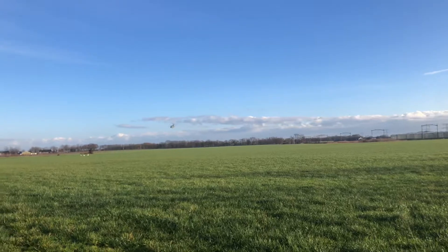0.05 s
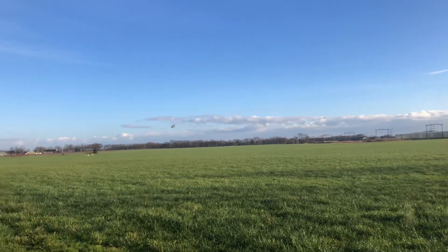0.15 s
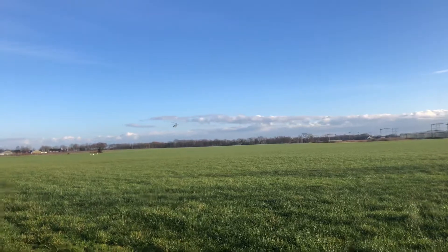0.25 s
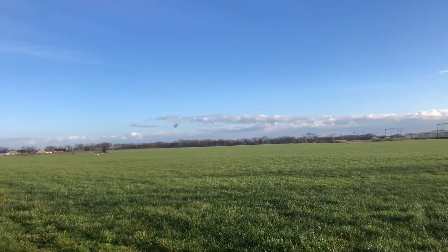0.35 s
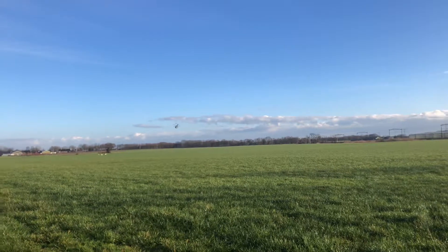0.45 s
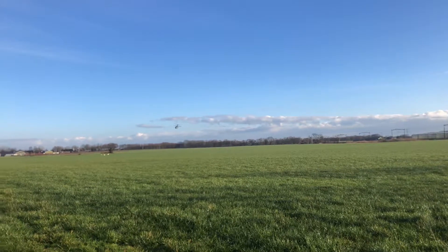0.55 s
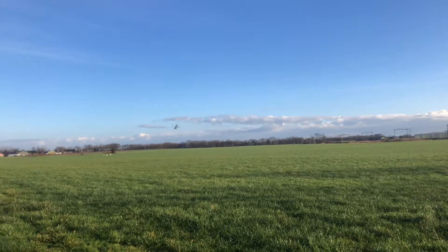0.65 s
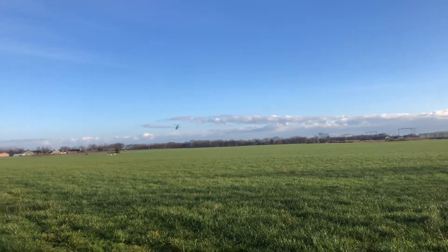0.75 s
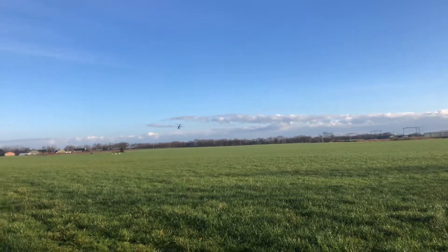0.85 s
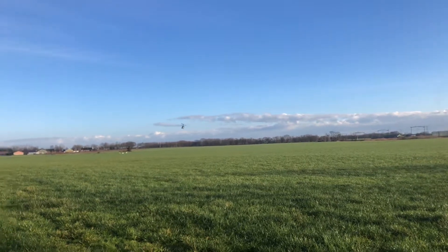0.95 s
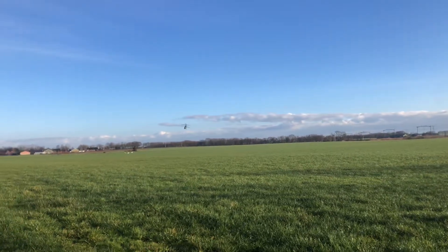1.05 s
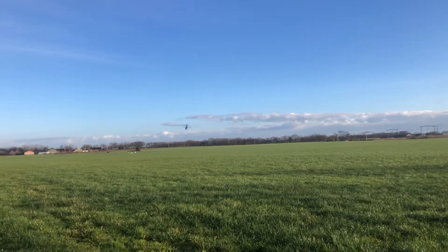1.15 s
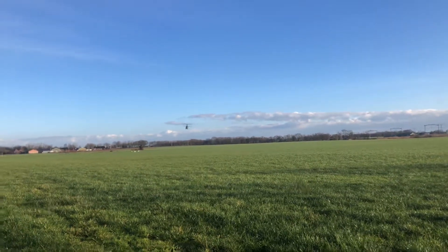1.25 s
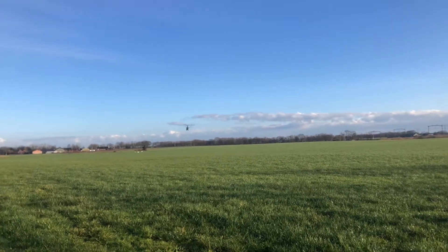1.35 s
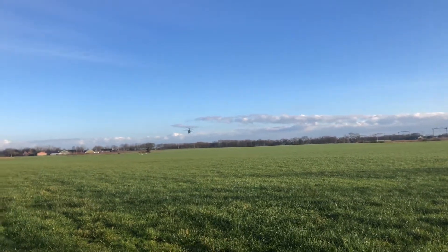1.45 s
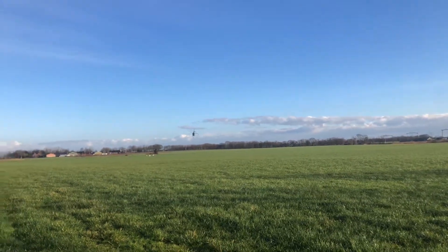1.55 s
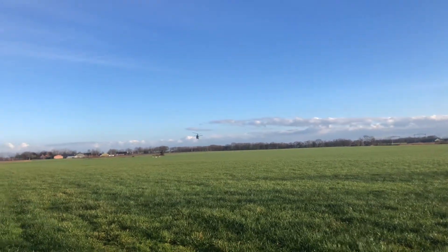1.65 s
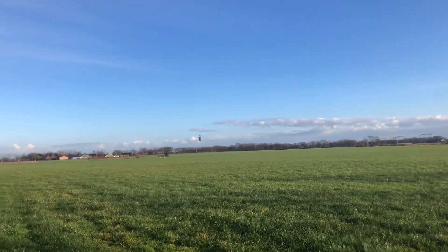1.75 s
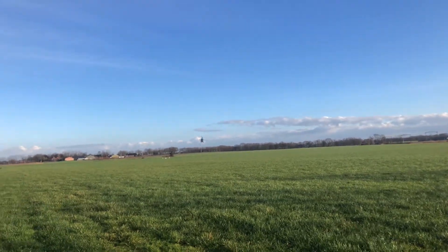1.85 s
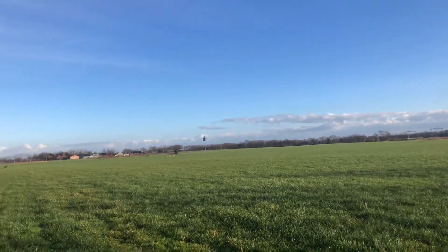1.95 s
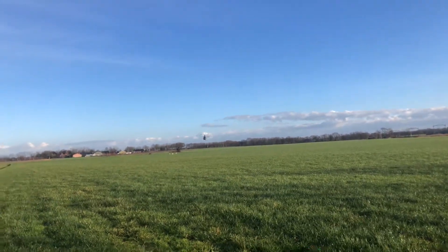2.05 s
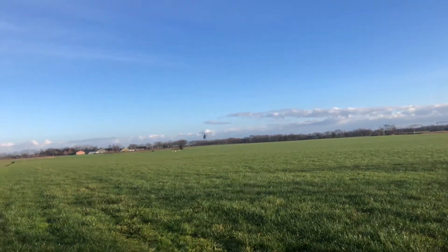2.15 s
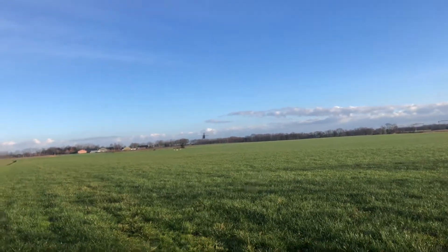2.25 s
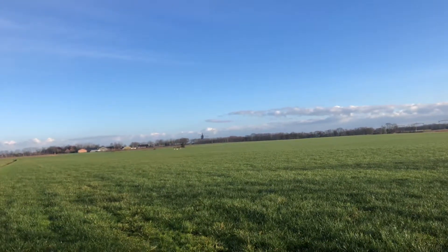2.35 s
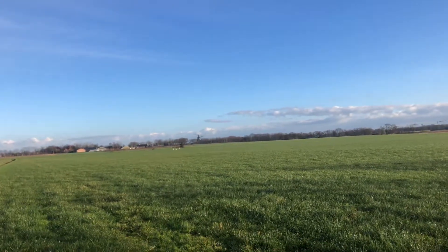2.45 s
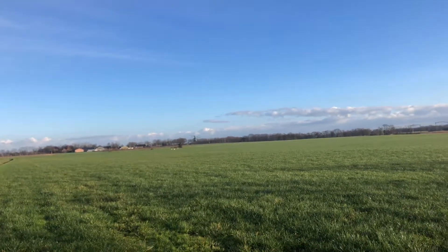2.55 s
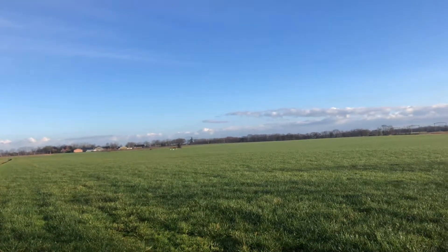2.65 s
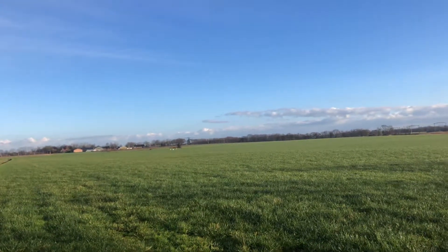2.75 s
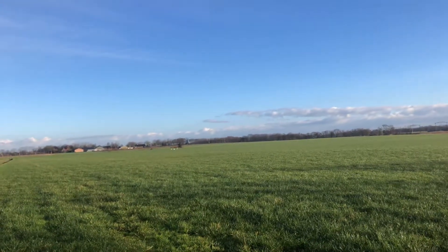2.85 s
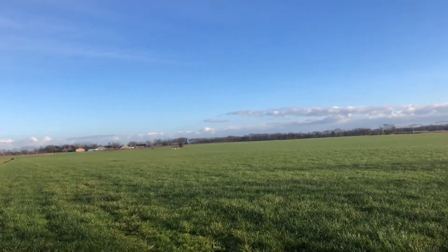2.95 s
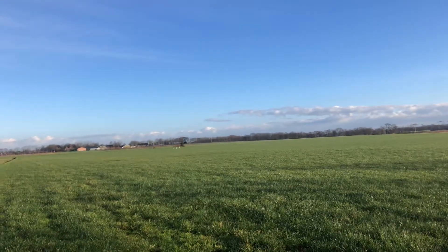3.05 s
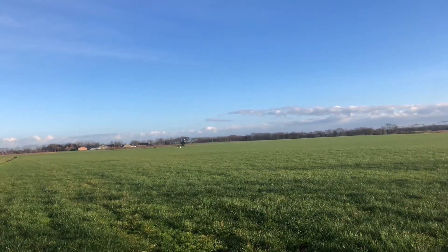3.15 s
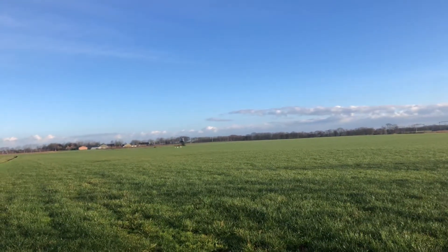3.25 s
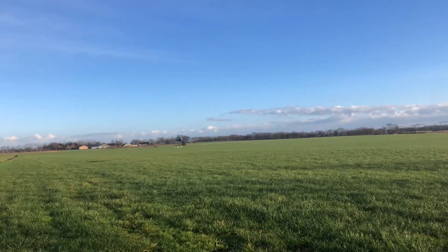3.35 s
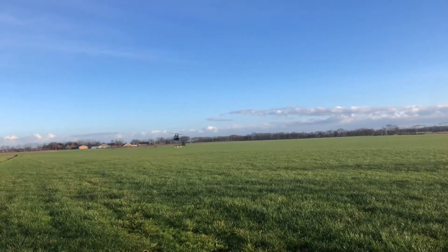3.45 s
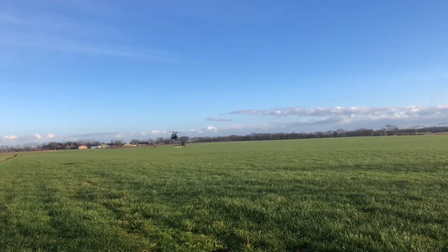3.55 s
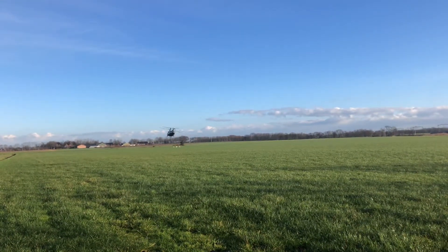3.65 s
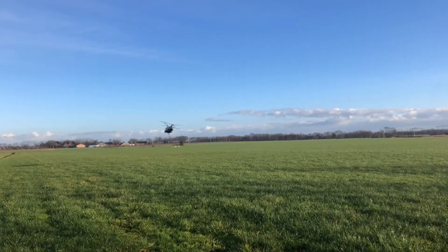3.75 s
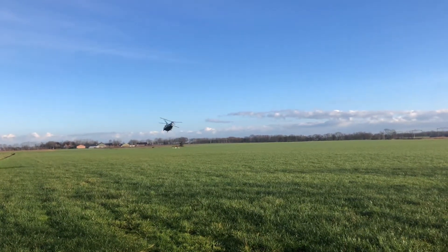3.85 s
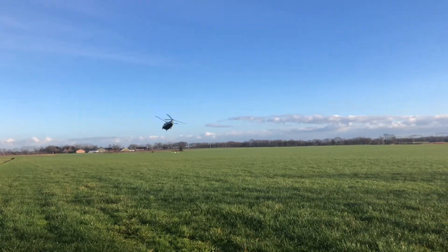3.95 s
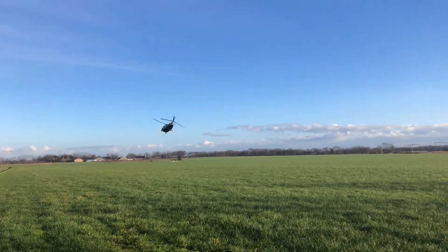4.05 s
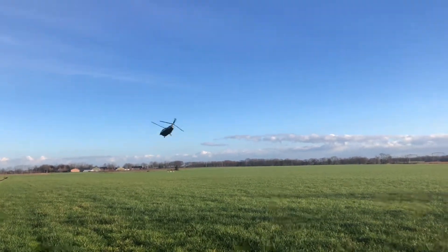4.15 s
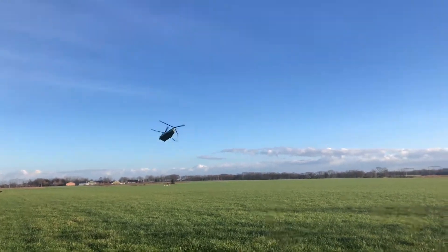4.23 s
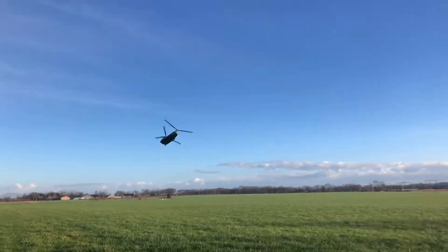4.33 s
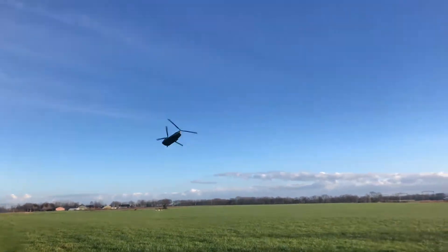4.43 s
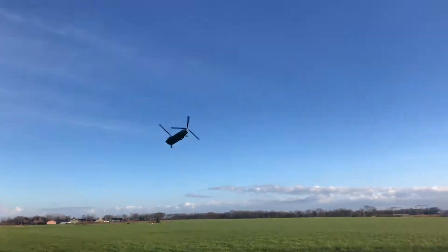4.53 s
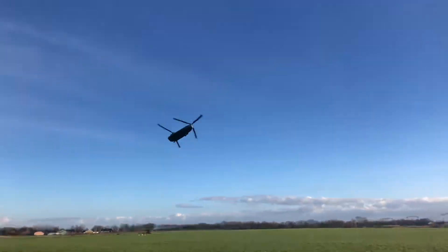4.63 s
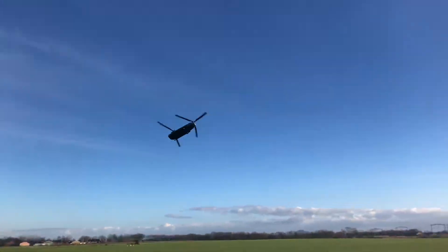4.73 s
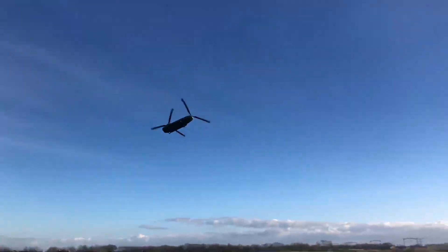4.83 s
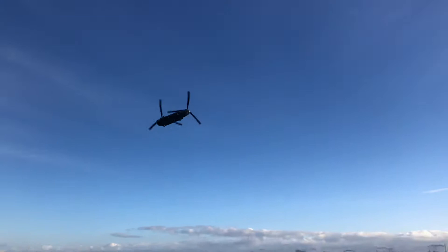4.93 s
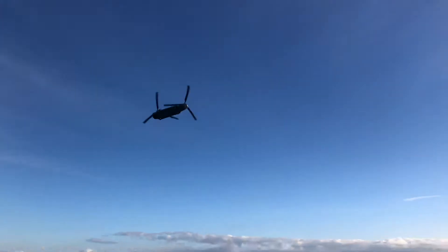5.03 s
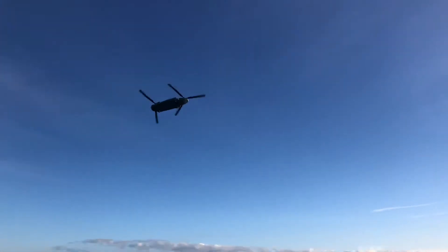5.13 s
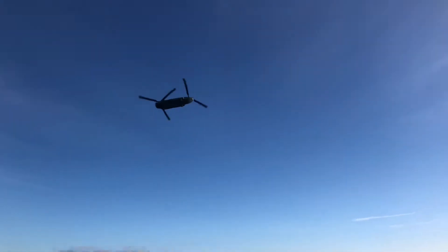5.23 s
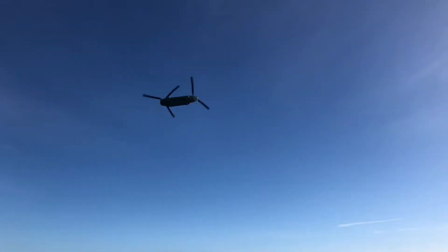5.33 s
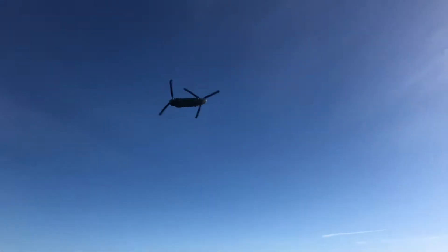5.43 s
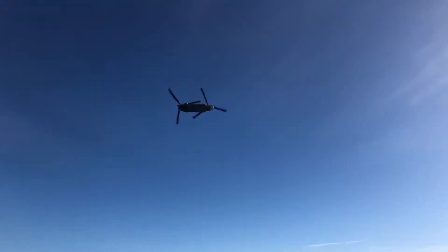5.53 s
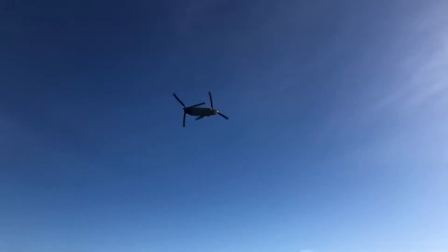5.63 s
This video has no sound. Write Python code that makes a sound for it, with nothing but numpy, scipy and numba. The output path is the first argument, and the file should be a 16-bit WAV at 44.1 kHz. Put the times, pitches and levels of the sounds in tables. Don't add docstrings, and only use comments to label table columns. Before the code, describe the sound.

A twin-rotor jet-powered model helicopter turns far away, its breathy rush and piercing whistle wavering in the air over a very faint country murmur. It then climbs close by; low rotor tones leap up, a rapid crackling chop takes over, and a hollow, downward-sweeping phasing from the ground colours the roar. It is still loud at the end, duller and lower. Handheld phone microphone, open field, no room echo..

```python
import sys
import numpy as np
from scipy import signal
from scipy.fft import rfft, irfft, next_fast_len
from scipy.io import wavfile
from scipy.ndimage import map_coordinates
from numba import njit

SR = 44100
rng = np.random.default_rng(int(sys.argv[2]) if len(sys.argv) > 2 else 0)


def undo_db(level):
    steps = np.asarray(level, float) / 20
    return 10 ** steps


def output_pcm(signal):
    pcm = np.clip(np.atleast_2d(signal).T, -1, 1) * 32767
    wavfile.write(sys.argv[1], SR, np.round(pcm).astype(np.int16))


N = 250929
FFT_SIZE = next_fast_len(N)

# t/s, f/Hz
WHINE_GLIDE = [(0, 10015), (.6, 10121), (1.2, 10180), (1.75, 10245), (2.1, 10207), (2.7, 10165), (3, 10168),
               (3.6, 10197), (3.9, 10179), (4.2, 10135), (4.5, 10056), (5.1, 9902), (5.7, 9758)]
# t/s, nearness as rotor rush level/dB, aim of the jet pipe at the listener level/dB
FLIGHT_PATH = [(0.0, -31.5, -13.5), (0.16, -30.5, -16.5), (0.4, -35.5, -10.5), (1.38, -37, -17),
               (1.95, -33, -12), (2.17, -32, -17), (3.07, -30, -16), (3.53, -28, -12.5), (3.58, -26, -13.5),
               (3.9, -26.5, -11), (4.1, -25, -9.5), (4.26, -23.5, -10.5), (4.48, -22.5, -9),
               (4.94, -20.5, -12), (4.96, -20.5, -12.5), (5.31, -21.5, -11), (5.69, -22, -12)]
# far level/dB, near level/dB, fully risen t/s, slowness of leap [0-1]
LOADING_TONES = [
    (-61, -39, 4.34, 0.2),
    (-64.5, -50.5, 4.4, 0.8),
    (-53.5, -29.5, 4.76, 0.45),
    (-52.5, -28, 4.79, 0.79),
    (-53, -34.5, 4.52, 0.8),
    (-53, -40.5, 4.2, .6),
]
# t/s, length/s, change level/dB
OVERHEAD_CHANGES = [
    (5.11, 0.18, -12),
    (4.8, .3, 8),
    (5.38, 0.13, 5.5),
    (4.74, .3, 2.0),
    (5.32, 0.26, -14),
    (5.235, 0.52, 12.5),
]
# t/s, length/s, change in slap level/dB
WAKE_BITES = [
    (4.2, 0.08, 0.5),
    (4.832, 0.052, -3.5),
    (4.973, 0.026, 3),
]
NOISE_CENTRES = [250, 1500, 6000, 13000]
# f/Hz, level/dB (per Hz)
AIR_COLOUR = [(35, -23), (100, -15.5), (400, 2), (1000, 2.5), (1400, 12.5), (1800, -2.5), (2350, 4),
              (3200, -1), (4500, -1), (5800, -3), (6100, -7.5), (6450, -2), (12000, -2), (15500, -3)]
# f/Hz while the whine is at 10170 Hz, level/dB against the rush
GEAR_TONES = [(996, -13), (1480, -30), (1992, -17), (2982, -23.5), (3978, -30), (5663, -30), (6627, -38),
              (8290, -28), (9943, -42)]
# t/s, level/dB
FLANK_FACING = [(0, -21), (1.2, -4), (1.9, -3), (3.2, -1.5), (3.7, -21), (4.4, -14), (5.7, -1.5)]
# t/s, depth level/dB, length/s
WHINE_FADES = [(.3, 11, 0.38), (1, 8, 0.11), (1.748, 18, 0.14), (2.2, 12, 0.28), (2.86, 7, 0.055),
               (3.424, 6, 0.07), (3.74, 12, 0.028), (3.98, 11, 0.035), (4.15, 2.5, 0.027),
               (4.337, 11, 0.039), (4.53, 10, 0.1), (4.756, 10, 0.058), (4.897, 16, 0.018),
               (4.997, 11, 0.029), (5.092, 16, 0.023), (5.174, 4, 0.014), (5.313, 6, 0.033),
               (5.383, 18, 0.0094), (5.44, 6, .02), (5.555, 12, 0.058), (5.67, 18, 0.023)]
# t/s, lag/ms, how cleanly the grass mirrors the highs [0-1]
GROUND_ECHO = [(0, 0.28, 0.4), (.4, 0.33, 0.7), (.8, 0.32, 1), (1.3, 0.28, 0.5), (2, .19, 0.67),
               (2.5, .16, 0.6), (3.1, 0.15, 0.5), (3.35, 0.22, 0.46), (3.5, 0.3, .45), (3.7, 0.444, 1),
               (3.9, 0.66, 1), (4.3, 1.234, 0), (4.8, 2.4, .5), (5, 3.01, 0.3), (5.2, 3.4, 0.6),
               (5.7, 3.6, 0.7)]
# t/s, f/Hz
GRASS_TURNOVER = [(0, 264), (.5, 325), (1.2, 465), (2, 313), (3.2, 292), (3.5, 584), (3.9, 1240),
                  (4.2, 1470), (5.7, 1170)]

WHINE_PER_BLADE, SLAP_AT_S = 136.43, 4.9737
PULL_S, FULL_S, PAST_S, PASSING_S = 3.44, 4.9, 5.096, 0.24
BANK_DB, BANK_S = 6, 0.71
NEAR_DB = -21.5
RUMBLE_DB, RUMBLE_FOLLOWS = -26, 0.72
HISS_GAIN_DB = 2.5
AIR_DB, AIR_FOLLOWS, AIR_AIM = -38, 1.34, 1.26
AIR_BEHIND_DB = 1.5
THROB = 0.027
CHOP, CHOP_S, CHOP_LENGTH_S = 0.6, 4.62, 0.097
CRACK_FAR_DB, CRACK_FULL_DB, CRACK_FADE_DB_PER_S = -29, -7, 22
CRACK_HZ, CRACK_SAG_HZ_PER_S = 1270, 420
THUD_HZ, TICK_HZ = 694, 2470
THUD_AHEAD_DB, THUD_BEHIND_DB, THUD_FADE_DB_PER_S = -8.5, -13.5, 8.5
TONES_RISE_S, WAVER_DB, WAVER_RAD = 3.55, 1.2, 0.05
GEAR_PATCHY_DB, GEAR_PATCHY_DB_PER_KHZ, GEAR_PATCHES_PER_S = 1.5, 0.25, 2.5
GEAR_BLUR_PER_KHZ = 0.13
GEAR_AIM_PER_KHZ = 0.13
WHINE_OVER_HISS_DB, WHINE_FOLLOWS = 1.5, 1.48
SCATTER_FAR, SCATTER_NEAR, SHIMMER_PER_S = 0.14, 0.33, 26
SLAP_ECHO_HZ, RUSH_ECHO_HZ, SCATTER_HZ = 5000, 6700, 1370
GRAZING_ECHO, STEEP_ECHO, STEEP_LAG_MS = 1, 0.74, 0.28
FIELD_DB = -51


def rms_one(x):
    return x / np.sqrt(np.mean(x ** 2) + 1e-20)


def clock():
    return np.arange(N) / SR


def in_time(rows):
    s, *columns = np.transpose(rows)
    return [np.interp(clock(), s, column) for column in columns]


def bell(at_s, width_s):
    return np.exp(-((clock() - at_s) / width_s) ** 2)


def drift(rate):
    r = np.exp(-80 * np.pi * rate / SR)
    slow = signal.lfilter([1], [1, -2 * r, r * r], rng.standard_normal(N // 40 + 2002))[2000:]
    return np.interp(np.arange(N) / 40, np.arange(len(slow)), rms_one(slow))


def bank():
    return np.exp(-clock() / BANK_S)


def load():
    return np.clip((clock() - PULL_S) / (FULL_S - PULL_S), 0, 1)


def behind():
    return np.clip((clock() - PAST_S) / PASSING_S + 1, 0, 1)


def whine_cycles():
    cycles = np.cumsum(in_time(WHINE_GLIDE)[0]) / SR
    return cycles - cycles[round(SLAP_AT_S * SR)]


def noise_levels():
    rush, aim = in_time(FLIGHT_PATH)
    far = rush - BANK_DB * bank() - NEAR_DB
    rumble = RUMBLE_DB + RUMBLE_FOLLOWS * far
    hiss = rush + aim + HISS_GAIN_DB
    air = AIR_DB + AIR_FOLLOWS * far + AIR_AIM * (aim + 12) + AIR_BEHIND_DB * behind()
    return rush, rumble, hiss, air


def slap_shape():
    past = np.maximum(clock() - PAST_S, 0)
    loaded = np.sin(np.pi / 2 * load())
    crack_db = CRACK_FAR_DB + (CRACK_FULL_DB - CRACK_FAR_DB) * loaded - CRACK_FADE_DB_PER_S * past
    crack_db = crack_db + sum(change_db * bell(s, length_s) for s, length_s, change_db in WAKE_BITES)
    thud_ahead_db = noise_levels()[0] + THUD_AHEAD_DB
    thud_db = (1 - behind()) * thud_ahead_db + behind() * THUD_BEHIND_DB - THUD_FADE_DB_PER_S * past
    return crack_db, CRACK_HZ - CRACK_SAG_HZ_PER_S * past, thud_db


def slaps(blades, uneven_db, jitter_s, turns):
    crack_db, crack_hz, thud_db = slap_shape()
    index = np.round(blades).astype(int)
    per_blade = rng.standard_normal((index.max() - index.min() + 1, 4))
    jitter, size, thud_size, tick_size = per_blade[index - index.min()].T
    late = (blades - index) * WHINE_PER_BLADE / in_time(WHINE_GLIDE)[0]
    a = (late - jitter_s * jitter) * crack_hz
    crack = -np.sin(2 * np.pi * (a - 0.3 * a ** 2)) * np.exp(-(a / turns) ** 2)
    c = (late + 0.00043 - jitter_s * jitter) * TICK_HZ
    tick = undo_db(-5.0 + 2.1 * tick_size) * np.sin(2 * np.pi * c) * np.exp(-(c / 0.73) ** 2)
    b = (late - 0.0005) * THUD_HZ
    thud = np.sin(2 * np.pi * b) * np.exp(-(b / 0.55) ** 2)
    tracking_db = np.array([1.2, -0.8, -0.4])[index % 3]
    sharp = undo_db(crack_db) * undo_db(uneven_db * size + tracking_db) * (crack + tick)
    return sharp + undo_db(thud_db + 0.19 * thud_size) * thud


def tone_levels():
    levels = []
    for tone, overhead in zip(LOADING_TONES, OVERHEAD_CHANGES):
        far_db, near_db, full_s, slowness = tone
        s, length_s, change_db = overhead
        rise = np.clip((clock() - TONES_RISE_S) / (full_s - TONES_RISE_S), 0, 1) ** slowness
        levels.append(far_db + (near_db - far_db) * rise + change_db * bell(s, length_s))
    return levels


def thumps(blades):
    out = 0
    for order, level_db in zip([1, 4 / 3, 2, 3, 4, 7], tone_levels()):
        gain = np.sqrt(2) * undo_db(level_db + WAVER_DB * np.sqrt(order) * drift(13.0))
        out = out + gain * np.sin(2 * np.pi * order * blades + WAVER_RAD * order * drift(4.1))
    return out


def airflow(blades, patchy_db):
    rush, rumble, hiss, air = noise_levels()
    per_hz_db = np.array([-26.5, -39.5, -35.5, -31.5])
    controls = np.array([rumble, rush, hiss, air]) + per_hz_db[:, None]
    chop = CHOP * bell(CHOP_S, CHOP_LENGTH_S)
    hz = np.maximum(np.fft.rfftfreq(FFT_SIZE, 1 / SR), 1)
    colour_hz, colour_db = np.transpose(AIR_COLOUR)
    coloured = rfft(rng.standard_normal(FFT_SIZE)) * undo_db(np.interp(np.log(hz), np.log(colour_hz), colour_db))
    place = 3 * np.log2(hz / 30)
    together = drift(5)
    flutter = drift(16)
    out = 0
    for k in range(28):
        band = irfft(coloured * np.cos(np.pi / 2 * np.clip(place - k, -1, 1)) ** 2, FFT_SIZE)[:N]
        centre = np.log(30 * 2 ** (k / 3))
        weights = np.array([np.interp(centre, np.log(NOISE_CENTRES), row) for row in np.eye(4)])
        depth = THROB * weights[1] + chop * (weights[2] + weights[3] / 2)
        pulse = 1 + depth * np.cos(2 * np.pi * blades)
        patches = together + drift(7.3) + weights[3] * 2.7 * flutter
        out = out + band * pulse * undo_db(weights @ controls + patchy_db * patches)
    return out * np.sqrt(SR / 2)


def gears(cycles):
    heard_db = noise_levels()[0] + in_time(FLANK_FACING)[0]
    aim = in_time(FLIGHT_PATH)[1] + 17.5
    out = 0
    for hz, level_db in GEAR_TONES:
        khz = hz / 1000
        patches_db = (GEAR_PATCHY_DB + GEAR_PATCHY_DB_PER_KHZ * khz) * drift(GEAR_PATCHES_PER_S)
        gain = np.sqrt(2) * undo_db(heard_db + level_db + GEAR_AIM_PER_KHZ * khz * aim + patches_db)
        blur = GEAR_BLUR_PER_KHZ * khz * drift(70.0)
        out = out + gain * np.sin(2 * np.pi * cycles * hz / 10170 + blur)
    return out


def whine_level():
    scatter = SCATTER_FAR + (SCATTER_NEAR - SCATTER_FAR) * load() ** 3
    scattered = scatter * (drift(SHIMMER_PER_S) + 1j * drift(SHIMMER_PER_S))
    rays = np.abs(1 + scattered) / np.sqrt(1 + 2 * scatter ** 2)
    level_db = -29.5 + WHINE_OVER_HISS_DB + WHINE_FOLLOWS * (noise_levels()[2] + 32.5) + 20 * np.log10(rays)
    return level_db - sum(fade_db * bell(s, length_s) for s, fade_db, length_s in WHINE_FADES)


def whine(cycles):
    gain = np.sqrt(2) * undo_db(whine_level() - 4.0 + 2.0 * drift(35))
    return gain * np.sin(2 * np.pi * cycles + 0.5 * drift(39))


@njit
def turn_over(x, pole):
    out, last_in, last_out = np.empty_like(x), 0., 0.
    for i in range(len(x)):
        last_out = pole[i] * (last_out - x[i]) + last_in
        last_in = x[i]
        out[i] = last_out
    return out


def grass(x, lag_ms, dull_hz, spread, clarity):
    strength = GRAZING_ECHO + (STEEP_ECHO - GRAZING_ECHO) * np.tanh((lag_ms / STEEP_LAG_MS) ** 3)
    bend = np.tan(np.pi * in_time(GRASS_TURNOVER)[0] / SR)
    hz = np.fft.rfftfreq(FFT_SIZE, 1 / SR)
    turned = rfft(turn_over(x, (1 - bend) / (1 + bend)), FFT_SIZE) / np.sqrt(1 + (hz / dull_hz) ** 4)
    lows = irfft(turned / (1 + (hz / SCATTER_HZ) ** 2), FFT_SIZE)[:N]
    highs = irfft(turned, FFT_SIZE)[:N] - lows
    mirrored = lows + clarity * highs
    lags = lag_ms * SR / 1000 * (1 + spread * np.linspace(-1, 1, num=4)[:, None])
    echoes = map_coordinates(mirrored, [np.arange(N) - lags], order=3, mode="nearest")
    return x + np.clip(strength, 0, 1) * echoes.mean(axis=0)


def field():
    band = signal.butter(4, [110, 575], "band", fs=SR, output="sos")
    return undo_db(FIELD_DB) * rms_one(signal.sosfilt(band, rng.standard_normal(N)))


def scene():
    cycles = whine_cycles()
    blades = cycles / WHINE_PER_BLADE
    lag_ms, clarity = in_time(GROUND_ECHO)
    lag_ms = lag_ms + 0.017 * drift(1.3)
    beats = slaps(blades, uneven_db=0.6, jitter_s=0.00003, turns=0.79) + thumps(blades)
    rush = undo_db(-1) * airflow(blades, patchy_db=0.51) + gears(cycles)
    craft = grass(beats, lag_ms, SLAP_ECHO_HZ, spread=0.0067, clarity=1.0)
    craft = craft + grass(rush, lag_ms, RUSH_ECHO_HZ, spread=0.069, clarity=clarity)
    return (craft + whine(cycles) + field())[None]


def band_limit(x):
    return signal.sosfilt(signal.butter(12, 15735, fs=SR, output="sos"), x)


def record(dry):
    heard = signal.sosfilt(signal.butter(2, 45, "high", fs=SR, output="sos"), dry)
    heard = 1.1 * np.tanh(heard / 1.1)
    return band_limit(heard)


dry = scene()
out = record(dry)
output_pcm(out)
```